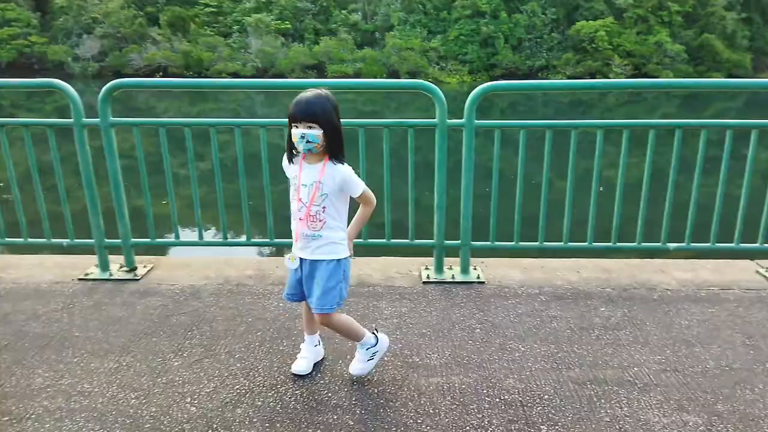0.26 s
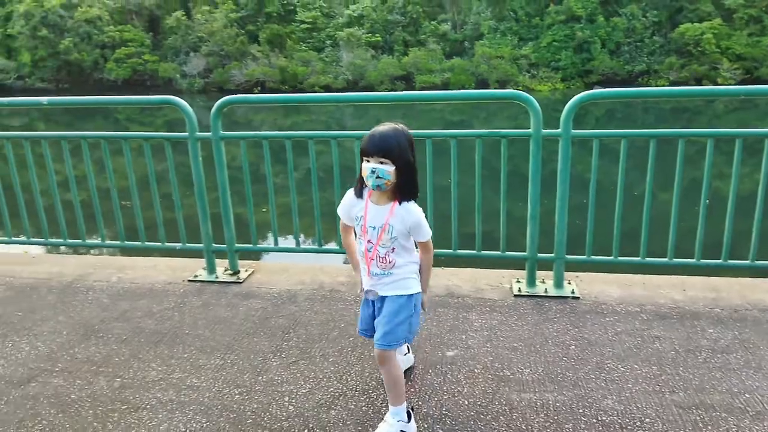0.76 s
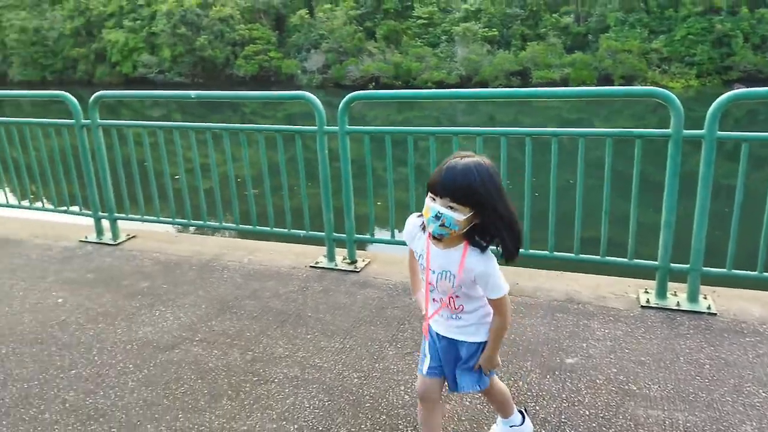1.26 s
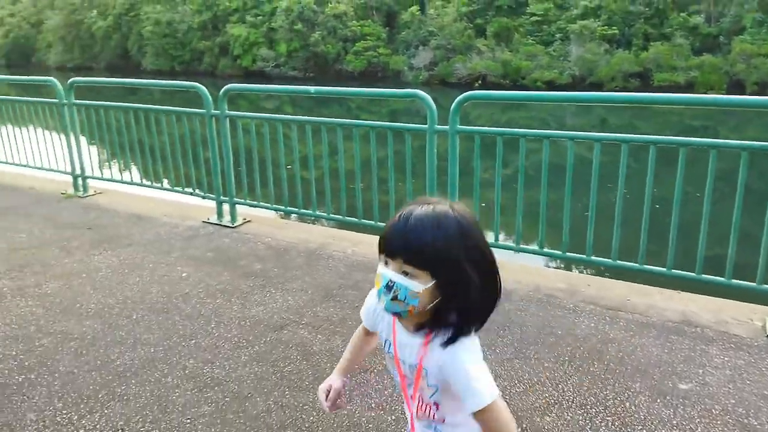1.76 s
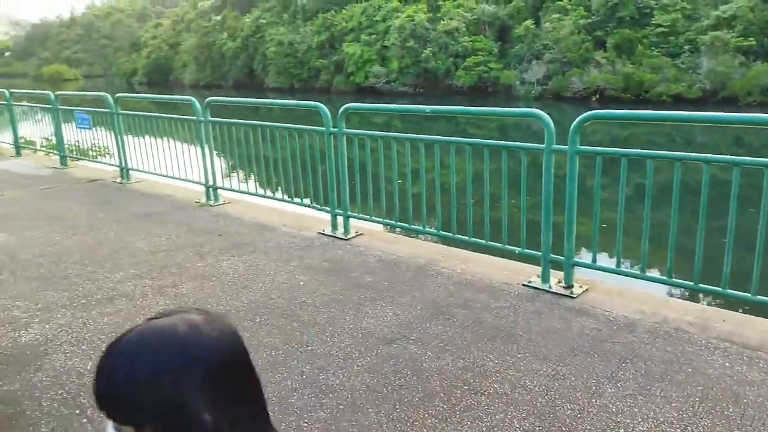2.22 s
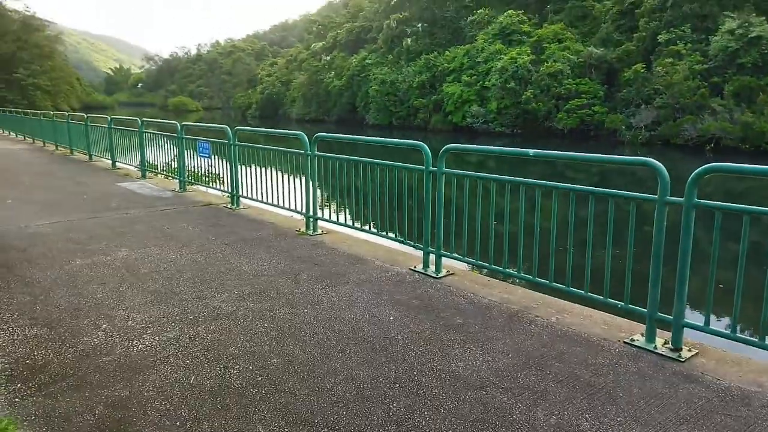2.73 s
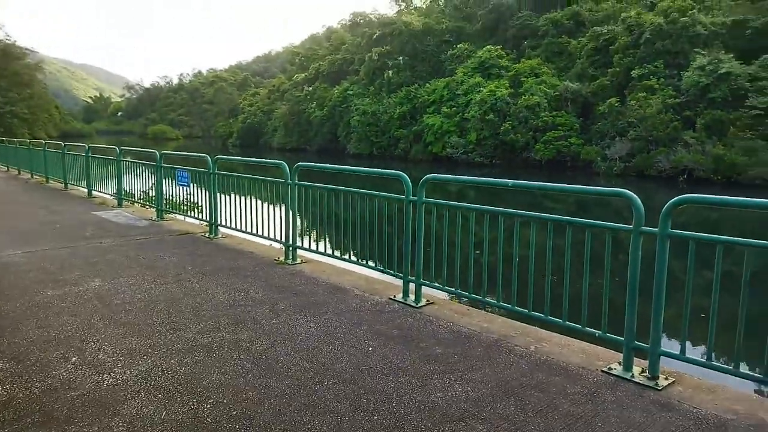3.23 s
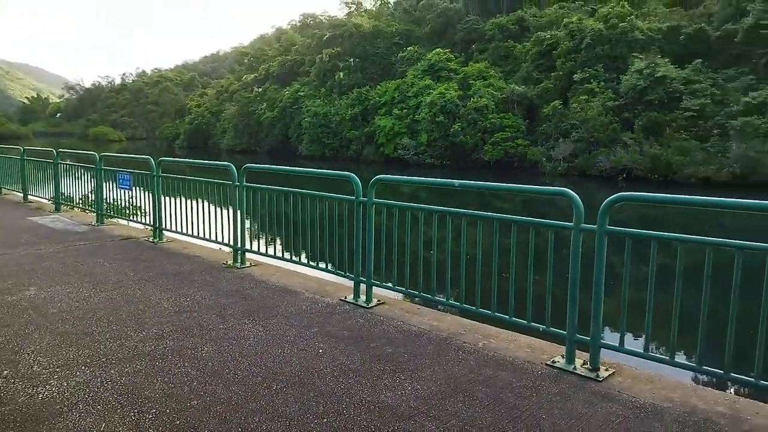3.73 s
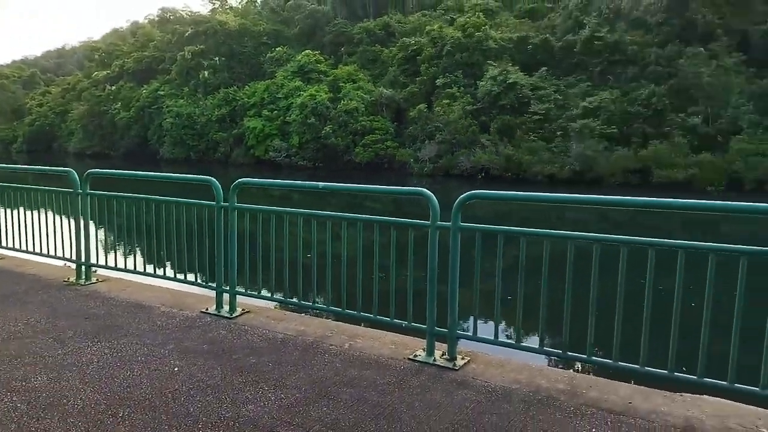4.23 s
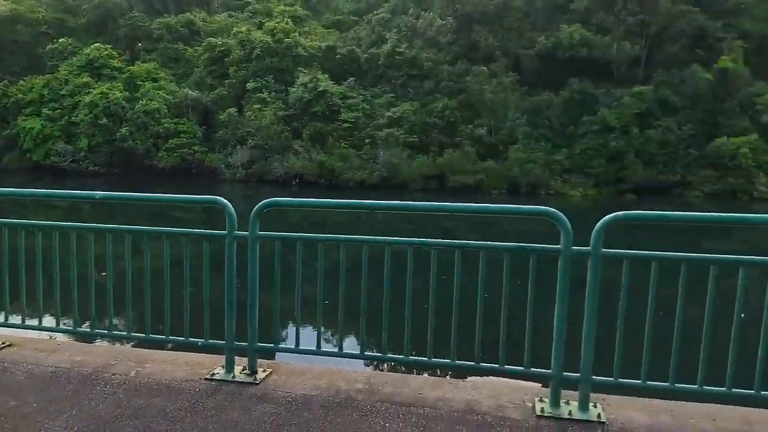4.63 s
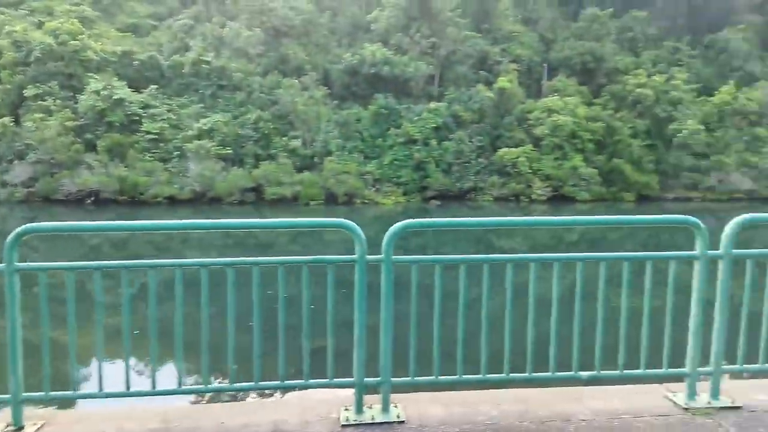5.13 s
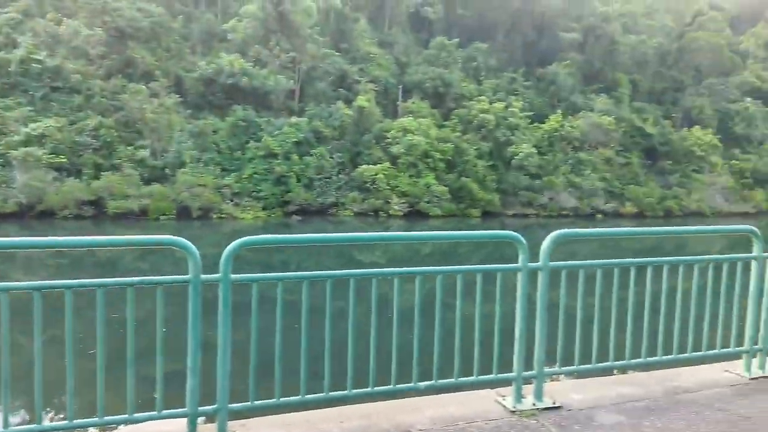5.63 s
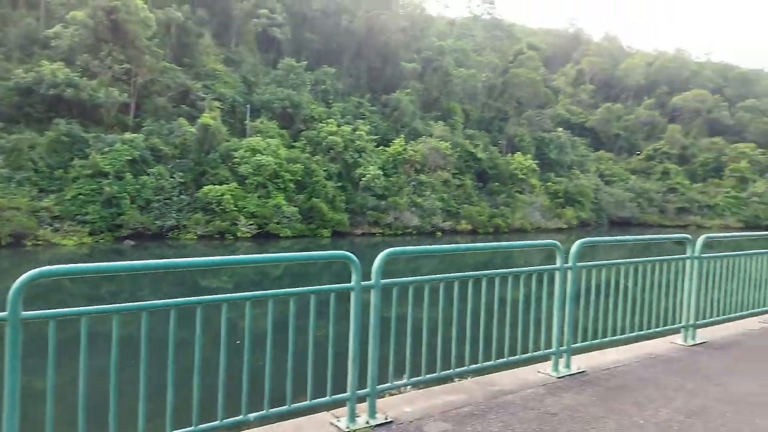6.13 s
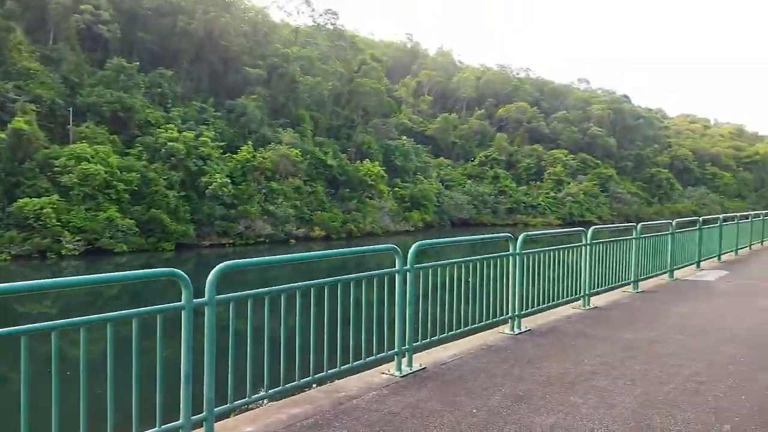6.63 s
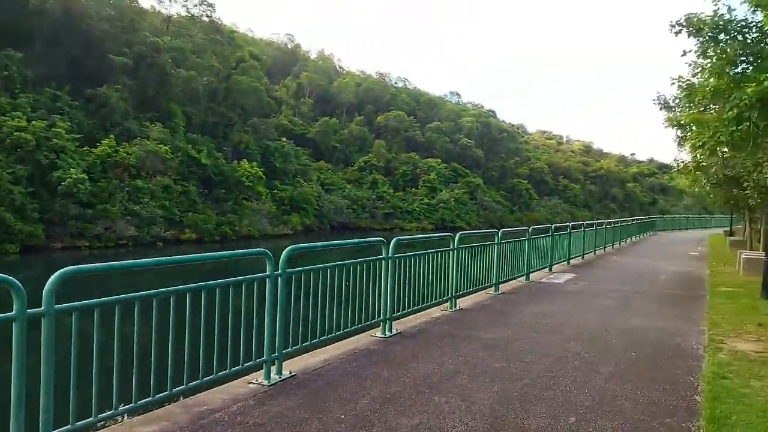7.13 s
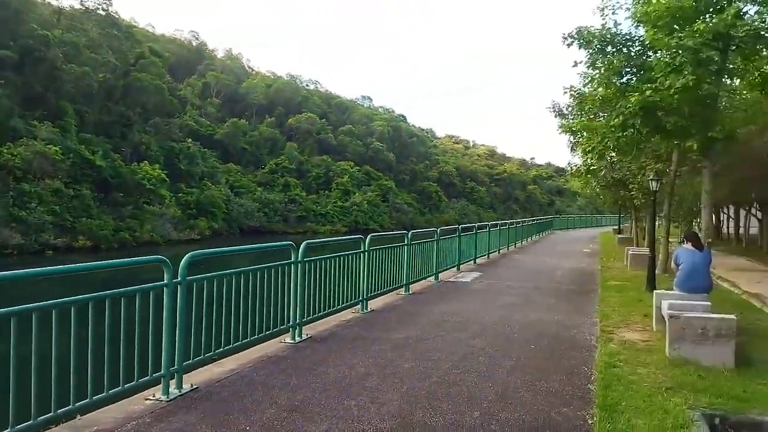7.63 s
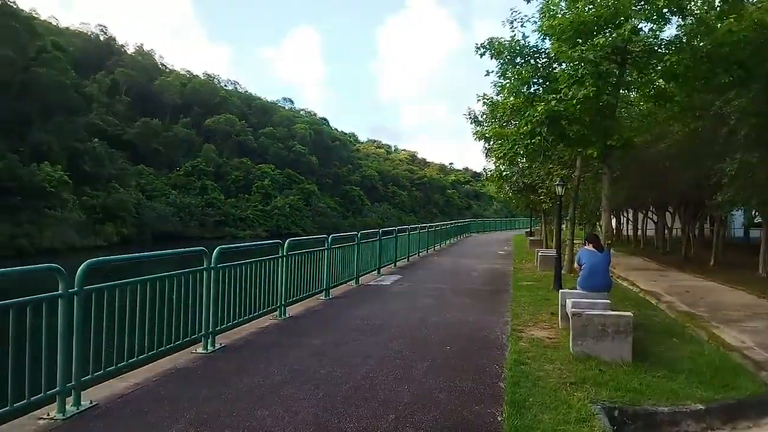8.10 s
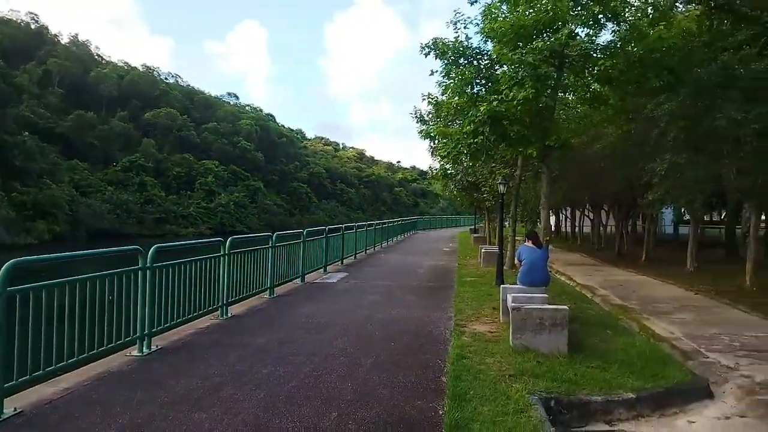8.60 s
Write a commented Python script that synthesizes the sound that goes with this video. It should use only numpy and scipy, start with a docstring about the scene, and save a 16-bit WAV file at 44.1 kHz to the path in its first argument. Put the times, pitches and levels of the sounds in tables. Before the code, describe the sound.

A steady, dense cicada chorus fills the outdoors, a bright shimmering shrill mostly between 4 and 8 kHz, with softly fluctuating individual singers. A soft step lands at 0.17 s, then everything drops to silence from about 0.19 to 0.34 s and fades back in. A faint hoarse bird phrase, falling and echoing, begins near 0.4 s. Child's shoes thud on gritty asphalt at 1.35 s, loudest at 1.77 and 2.1 s, with crisp scuffs and a sharp grit snap at 2.6 s. Lighter steps and scrapes continue to about 6.2 s. The bird phrase returns at 3.6 and 7.1 s; thin single whistles dot the scene, clearer around 5 s and after 7.4 s. Low distant rumble, leaves and a barely audible hum stay beneath. From 5 s the cicadas swell by several decibels and lean left, continuing to the end at 8.9 s.

```python
"""A cicada chorus shrills in the woods across a pond while a hand-held camera turns along a park path.
Ringing tymbal clicks make the near singers and shaped noise the far swarm. A child's shoes thud and scuff
past as grain bursts through resonances; gliding sines make one bird's repeated falling phrase and single
whistles. Shaped noise and a faint hum lie beneath as a far town rumble and leaves.
The sound drops out once near the start and fades back in."""
import sys
import numpy as np
from scipy import signal
from scipy.fft import rfft, irfft, next_fast_len
from scipy.io import wavfile
from scipy.ndimage import uniform_filter1d, map_coordinates

SR = 44100
rng = np.random.default_rng(int(sys.argv[2]) if len(sys.argv) > 2 else 0)


def wav_record(signal):
    """Record a signal, one row per channel, as 16-bit PCM in the file named by sys.argv[1]."""
    frames = np.transpose(np.atleast_2d(signal))
    bounded = np.clip(frames, -1, 1)
    # unit amplitude maps onto the largest positive 16-bit level
    quanta = np.round(bounded * 32767).astype(np.int16)
    wavfile.write(sys.argv[1], SR, quanta)


N = 390726
TIME = np.arange(N) / SR

# The chorus grows as the camera turns: (time [s], level [dB])
CHORUS_LEVEL = [(0, -43.5), (.2, -45), (.5, -46), (1.1, -46), (4.7, -45.5), (5.6, -44), (6.3, -42.5),
                (7.05, -41), (8.86, -40.5)]
# Where the chorus lies: (time [s], left over right [dB])
CHORUS_PAN = [(0, -2), (.9, -0.5), (2, 0.5), (5.2, -1.5), (6.6, -4.5), (8.86, -4.5)]
# Single cicadas standing out of the chorus: (tymbal frequency [Hz], width of one pass [Hz], level [dB])
SINGERS = [(4977, 92, -11), (5366, 240, -2), (5726, 190, -3.5), (6054, 190, 0.5), (6300, 320, 0.5),
           (6580, 480, -1), (6750, 120, -4), (7046, 46, -6.5), (7766, 410, -10), (8810, 170, -16.5),
           (10700, 120, -33), (11900, 400, -20)]
# Spectrum of the blurred far chorus: (frequency [Hz], relative density [dB per Hz])
SWARM_SPECTRUM = [(2180, -57), (3700, -40), (3860, -54), (3980, -13.5), (4710, -10), (5220, -10),
                  (6340, 3.5), (6940, 2.5), (7550, -14), (8790, -10.5), (11500, -20.5), (12200, -24),
                  (15700, -25)]
# The shrill band dips briefly: (centre time [s], length [s], depth [dB])
SHRILL_DIPS = [(4.875, .026, -9), (5.133, .022, -12)]

# Spectrum of town rumble and leaves: (frequency [Hz], relative density [dB per Hz])
AIR_SPECTRUM = [(24, -53), (40, -20), (65, -2.5), (166, -5), (227, -4.5), (314, -7.5), (641, -19),
                (734, -16.5), (1850, -22.5), (2420, -16.5), (3700, -22), (4000, -22), (5200, -45.5),
                (8800, -120)]
# Swell of rumble and leaves: (time [s], level [dB])
AIR_LEVEL = [(0, -52), (.5, -54.5), (1.5, -57.5), (2.3, -53.5), (3.7, -57.5), (8.86, -56.5)]
# How alike diffuse noise is in the two channels: (frequency [Hz], left-right likeness [-1 to 1])
STEREO_LIKENESS = [(60, 0.94), (150, 0.96), (380, 0.61), (950, 0), (2380, -0.0), (5980, 0.0092), (15000, 0)]
HUM_HZ, HUM_DB, HUM_WAVER_HZ = 320.4, -68, 1.2  # a far machine's hum

# Soles landing: (time [s], strength [dB], grit over the thump [dB])
THUDS = [(0.064, -46, -17), (0.1677, -24.5, -7), (.54, -45, -9), (1.126, -50, 5), (1.347, -23.5, -29),
         (1.371, -35.5, -6), (1.771, -11.5, -14.5), (1.781, -17, -18), (2.1082, -19.5, -8),
         (2.112, -18.5, -16), (2.1193, -13.5, -11), (2.1252, -19, -10), (2.1333, -16, -10),
         (2.486, -24.5, -10.5), (2.7715, -23, -13), (2.617, -47, 12.5), (2.906, -29, -22),
         (3.399, -30, -15), (3.515, -53, 3), (3.692, -32, -10), (4.007, -27.5, -11), (4.703, -34.5, -22),
         (5.061, -25, -18), (5.388, -45, 0), (5.403, -45, 8), (5.4166, -22, -21), (5.435, -39, -20),
         (5.451, -34, -17), (5.967, -28.5, -11), (6.182, -45.5, 1)]
# Scuffs and snaps of grit under the shoes:
# (peak time [s], length [s], strength [dB], fine grit over coarse [dB], top fizz over coarse [dB])
SCUFFS = [(1.35, 0.0026, -48, -15, -25), (1.365, .005, -46, -12, -24.5), (1.379, .006, -48, -4, -25),
          (1.7738, .002, -30, -33, -15.5), (1.782, .006, -44, -13, -5), (2.110, 0.0035, -34, 5.5, -10),
          (2.1198, 0.003, -39, -5, -25), (2.1266, 0.003, -28, -9, -30), (2.1356, 0.002, -24.5, -23, -33),
          (2.190, .002, -30, -21, -24), (2.194, 0.0022, -32.5, -22, -14.5), (2.278, 0.006, -38.5, -20, -27),
          (2.288, 0.0034, -50, -15, -26.5), (2.301, .005, -45.5, -13, -27),
          (2.458, .006, -33.5, -0.5, -16.5), (2.494, .01, -41, -7, -14), (2.604, 0.0018, -29, -12.5, -26),
          (2.6088, 0.0012, -17, 3, -11.5), (2.613, .0015, -25, -9, -23), (2.619, .002, -29.5, -2, -10),
          (2.671, 0.014, -44, -10, -19), (2.687, .008, -35, -2, -19), (2.699, .005, -35, -1, -24),
          (2.707, .005, -33, 1, -21.5), (2.7865, .002, -25, -3.5, -8), (2.789, 0.0035, -26, 1, -14.5),
          (2.848, 0.0064, -38.5, -3, -13), (2.903, .012, -41.5, -13, -15), (3.17, 0.0042, -34, 4, -10.5),
          (3.25, .012, -43.5, -10, -19), (3.273, 0.0091, -39, 0, -24), (3.47, .006, -48, -15, -27),
          (3.497, .008, -40, -11, -25), (3.515, .004, -31.5, -4, -25), (3.701, .02, -45.5, 1.5, -5.5),
          (4.008, 0.0066, -35, 2, -16), (4.113, 0.017, -47.5, -1, -18), (4.49, 0.018, -48, -8, -28)]
# Resonances of rubber sole on asphalt: (frequency [Hz], width [Hz], level [dB])
SOLE_MODES = [(286, 176, 2), (403, 187, 2), (633, 300, -8.5)]
# Resonances of coarse grit: (frequency [Hz], width [Hz], level [dB])
COARSE_GRIT_MODES = [(1650, 1600, -5.5), (2620, 570, 5.5)]
# Resonances of fine grit: (frequency [Hz], width [Hz], level [dB])
FINE_GRIT_MODES = [(3560, 560, 4), (4660, 490, 3.5)]
THUD_RISE_S, THUD_DECAY_S = 0.00302, 0.0088
SCUFF_RISE = 1.1  # a scuff swells over this multiple of its length
PUSH_DB, ROLL_DB = 20.5, -5  # the heel's single push and the rubber's roll after it, over the strength

# Notes of the bird's phrase:
# (time after its start [s], length [s], first pitch [Hz], last pitch [Hz], level [dB])
PHRASE_NOTES = [(0, 0.0258, 2080, 2800, 2), (0.01, 0.036, 3256, 3385, -3.5),
                (.195, 0.019, 3130, 2950, -4.5), (0.213, 0.0331, 2820, 2400, 4),
                (.235, 0.043, 2728, 2640, 1), (.315, .016, 2600, 1950, -3.5),
                (0.335, 0.025, 2465, 2196, -1.5), (.352, 0.0226, 2300, 1713, -4.5),
                (.385, .025, 2200, 1780, -10), (0.44, 0.053, 1700, 1560, -17.5)]
# Each singing of the phrase: (start time [s], level [dB], and changes to the first high note [dB],
# second high note [dB], opening note [dB], closing notes [dB])
PHRASES = [(0.379, -49, 3, 0, 2, 0), (3.6, -43, -6, -7, -0.5, -1), (7.07, -48, 3, 2, -5.5, -0.096)]
# Single bird whistles, some just before the phrase:
# (time [s], length [s], first pitch [Hz], last pitch [Hz], level [dB], left over right [dB])
WHISTLES = [(0.415, .09, 1313, 1393, -62.5, -3), (3.455, 0.055, 2950, 2830, -64, -3),
            (3.474, 0.043, 2430, 2460, -62, -3), (7.062, 0.034, 1580, 1630, -67, -3),
            (7.176, 0.053, 1650, 1580, -72, -3), (7.26, .06, 1735, 1720, -66, -3),
            (3.713, 0.098, 4300, 4265, -58.5, -5), (4.14, 0.2, 2990, 3070, -67, -10),
            (4.56, .05, 2050, 2110, -67, -3), (4.63, 0.065, 2540, 2424, -63, -11),
            (4.70, 0.075, 2540, 2400, -66.5, -11), (4.79, .06, 2430, 2510, -68, -9),
            (4.949, 0.2, 3810, 3620, -54.5, -12), (5.287, .12, 4414, 4400, -58.5, -14),
            (5.348, 0.047, 2830, 2620, -60.5, -1), (6.368, 0.12, 2635, 2580, -58.5, -7),
            (6.567, 0.09, 2060, 1864, -60, -4), (6.62, 0.19, 1885, 1892, -64, -4),
            (6.97, 0.074, 2750, 2630, -66.5, -7), (7.039, 0.072, 2515, 2606, -61, -8),
            (7.442, 0.16, 4400, 4370, -55, -4), (7.662, 0.088, 4070, 4030, -51, 1),
            (7.694, 0.041, 3360, 3250, -59, 3), (7.82, 0.22, 3894, 4156, -54, 3)]
CLOSING_S = 0.3  # notes after this close the phrase
PHRASE_BURR = 0.4  # the phrase is hoarse: depth of a fast random flutter

# The two ports colour all sounds differently: (frequency [Hz], left over right [dB])
PORT_TILT = [(300, 0), (1200, -0.5), (2600, -7), (4500, -0.5), (6500, 0.5), (8500, 10.5), (11000, -0.5),
             (15500, 4.5)]
# Wind filter and dips of the camera body: (frequency [Hz], gain [dB])
HOUSING_GAIN = [(30, 3.5), (55, -7), (80, -0.5), (3300, 0), (3750, -3), (4050, -0.5), (7200, 1), (7450, 4),
                (7700, 1.5), (11100, 2), (11500, -4), (11900, 3.5)]
CUT_S, FALL_DB_PER_S = 0.1846, 3505  # the sound drops out
BACK_S, JUMP_DB_PER_S, BACK_DB, FADE_S = 0.3407, 3500, -7.5, 0.15  # it jumps back a little low and fades up
TOP_HZ = 15790  # band limit


def amp(db):
    """Turn decibels into an amplitude factor."""
    return 10 ** (np.asarray(db) / 20)


def unit(x):
    """Scale to an rms of 1."""
    return x / np.sqrt(np.mean(x ** 2) + 1e-20)


def along(points, hz):
    """Read (frequency [Hz], value) points on a log frequency axis."""
    f, v = np.transpose(points)
    return np.interp(np.log(hz + 1), np.log(f + 1), v)


def curve(points):
    """Read (time [s], value) points at every sample."""
    s, values = np.transpose(points)
    return np.interp(TIME, s, values)


def wobble(rate):
    """A smooth random curve through rate knots a second."""
    knots = rng.standard_normal(int(N * rate / SR) + 4)
    return map_coordinates(knots, [TIME * rate])


def panned(x, db):
    """Two channels, db louder on the left."""
    return np.array([x * amp(db / 2), x * amp(-db / 2)])


def filtered(x, response):
    """Shape the spectrum of x by a complex response of frequency."""
    m = next_fast_len(N + 8192)
    return irfft(rfft(x, m) * response(np.fft.rfftfreq(m, 1 / SR)), m)[..., :N]


def modes(table):
    """Causal response of (frequency [Hz], width [Hz], level [dB]) resonances, alternating in sign."""
    def response(f):
        total = 0
        for k, (centre, width, db) in enumerate(table):
            damping = 1j * f * width
            total = total + (-1) ** k * amp(db) * damping / (centre ** 2 - f ** 2 + damping)
        return total
    return response


def rush(spectrum, patchy_db):
    """Stereo noise of rms 1: random gains patch time and frequency, mid and side set the width."""
    grid = signal.stft(rng.standard_normal((2, N)), nperseg=1024)[2]
    patches = uniform_filter1d(rng.standard_normal(grid.shape), size=2, axis=1)
    patches = uniform_filter1d(patches, size=3, axis=2)
    pair = signal.istft(grid * amp(patchy_db * unit(patches)), nperseg=1024)[1][:, :N]

    def mid_side(hz):
        angle = np.arccos(np.clip(along(STEREO_LIKENESS, hz), -1, 1)) / 2
        return amp(along(spectrum, hz)) * [np.cos(angle), np.sin(angle)]

    mid, side = filtered(pair, mid_side)
    return unit(np.array([mid + side, mid - side]))


def scatter(x, t60):
    """Echoes off surroundings: noise tails of energy 1, redrawn every eighth of a second and cross-faded."""
    hop = SR // 8
    t = np.arange(SR // 2) / SR
    decay = amp(-60 * t / t60)
    decay = decay / np.linalg.norm(decay)
    window = np.sin(np.pi * np.arange(2 * hop) / (2 * hop))
    padded = np.pad(x, ((0, 0), (hop, 2 * hop)))
    out = np.zeros((2, N + SR * 2))
    for at in range(0, N + hop, hop):
        tail = rng.standard_normal((2, len(t))) * decay
        echo = signal.fftconvolve(padded[:, at:at + 2 * hop] * window, tail, axes=1)
        out[:, at:at + echo.shape[1]] += echo
    return out[:, hop:hop + N]


def cicadas():
    """Each singer buckles its tymbal a few hundred times a second into one resonance; the rest blur."""
    near = np.zeros((2, N))
    for hz, width_hz, db in SINGERS:
        buckle_hz = rng.uniform(180, 320) * (1 + 0.18 * wobble(150))
        cycles = np.cumsum(buckle_hz) / SR
        buckles = np.diff(np.floor(cycles), prepend=0) * amp(2.35 * rng.standard_normal(N))
        tymbal = modes([(hz, width_hz, 0)])
        song = unit(filtered(buckles, lambda f: tymbal(f) ** 2))
        song_db = db + 1.9 * wobble(12) + 1.4 * wobble(4)
        near += panned(song * amp(song_db), 1.1 * wobble(0.63))
    near = scatter(near, t60=0.091)
    # hold the slow level of the sum even
    near = near / np.sqrt(np.abs(uniform_filter1d(near ** 2, size=SR // 5, axis=1)))
    chorus = amp(-3) * near + amp(-4) * rush(SWARM_SPECTRUM, patchy_db=5)

    dip_db = sum(db * np.exp(-((TIME - s) / (length / 2)) ** 4) for s, length, db in SHRILL_DIPS)
    shrill = filtered(chorus, lambda hz: (hz > 4000) & (hz < 7500))
    chorus = chorus + (amp(dip_db) - 1) * shrill
    pan_db = curve(CHORUS_PAN)
    return unit(chorus) * amp(curve(CHORUS_LEVEL)) * amp([pan_db / 2, -pan_db / 2])


def background():
    """Far traffic and leaves as swelling shaped noise, under a faint hum wavering in pitch and level."""
    hum_hz = HUM_HZ + HUM_WAVER_HZ * wobble(8)
    hum = unit(np.sin(2 * np.pi * np.cumsum(hum_hz) / SR)) * amp(HUM_DB + wobble(2.91))
    air_db = curve(AIR_LEVEL) + 0.98 * wobble(4)
    return amp(air_db) * rush(AIR_SPECTRUM, patchy_db=3) + hum


def bursts(s, db, length, rise, spiky_db):
    """A run of uneven grains for each contact, swelling up to its time and dying over its length."""
    out = np.zeros(N + SR)
    t = np.arange(SR // 8) / SR
    for peak, level, life, up in zip(s, db, length, rise):
        shape = np.where(t < up, (t / up) ** 0.67, np.exp(-np.abs(t - up) / life))
        grains = shape * rng.standard_normal(len(t)) * amp(spiky_db * rng.standard_normal(len(t)))
        # few large grains or many small ones carry the same energy
        energy = np.linalg.norm(shape) / np.linalg.norm(grains)
        out[round((peak - up) * SR):][:len(t)] += amp(level) * energy * grains
    return out[:N]


def thuds():
    """Soles push and roll into rubber resonances, and grit crunches under them: (thump, crunch)."""
    s, db, grit_db = np.transpose(THUDS)
    decay, rise = np.full(len(s), THUD_DECAY_S), np.full(len(s), THUD_RISE_S)
    push = np.bincount(np.round(s * SR).astype(int), amp(db + PUSH_DB), N)
    push = uniform_filter1d(uniform_filter1d(push, size=20), size=20)  # rubber rounds the push
    roll = bursts(s + rise, db + ROLL_DB, decay, rise, spiky_db=3)
    thump = filtered(roll - push, modes(SOLE_MODES))
    grains = bursts(s + rise / 2, db + grit_db, decay / 2, rise, spiky_db=7.5)
    crunch = filtered(grains, lambda f: modes([(1050, 1100, 0)])(f) ** 2)
    return thump, crunch


def scuffs():
    """Grit scrapes and snaps: separate grain bursts ring coarse grit, fine grit and a top fizz."""
    s, length, db, fine_db, fizz_db = np.transpose(SCUFFS)
    rise = SCUFF_RISE * length
    coarse = filtered(bursts(s, db, length, rise, spiky_db=10), modes(COARSE_GRIT_MODES))
    fine = filtered(bursts(s, db + fine_db, length, rise, spiky_db=4), modes(FINE_GRIT_MODES))
    fizz_modes = modes([(7840, 3000, 1.4), (11600, 4000, 4.8)])
    fizz = filtered(bursts(s, db + fizz_db, length, rise, spiky_db=4.5), fizz_modes)
    return coarse + fine + fizz


def shoes():
    """Thumps and crunches sit alike in both ports, scuffs reach the left first; the ground scatters all."""
    thump, crunch = thuds()
    grit = scuffs()
    grit = np.array([grit, np.roll(grit, shift=16)])  # right port 16 samples later
    echo = scatter(grit + crunch + amp(-20.5) * thump, t60=0.045)
    return thump + crunch + grit + amp(-3) * echo


def note(length, hz0, hz1, db, burr):
    """One gliding whistle, wavering in pitch and strength, hoarse by burr."""
    u = np.linspace(0, 1, round(length * SR))

    def waver():
        return np.interp(u, np.linspace(0, 1, 10), rng.standard_normal(10))

    hz = hz1 + (hz0 - hz1) * (1 - u) ** 1.543 + 20 * waver()
    flutter = 1 + burr * unit(uniform_filter1d(rng.standard_normal(len(u)), size=110))
    swell = np.sin(np.pi * u ** 0.85) ** 0.78
    return flutter * amp(db + 1.4 * waver()) * swell * np.sin(2 * np.pi * np.cumsum(hz) / SR)


def bird_phrase():
    """One bird repeats its phrase of hoarse glides, heard mostly as echo from near and far trees."""
    song = np.zeros((2, N + SR))
    for start, level_db, high_db, second_high_db, opening_db, closing_db in PHRASES:
        first_notes_db = {0: opening_db, 1: high_db, 2: second_high_db}
        for k, (s, length, hz0, hz1, db) in enumerate(PHRASE_NOTES):
            note_db = level_db + db + first_notes_db.get(k, 0) + closing_db * (s > CLOSING_S)
            wave = note(length, hz0, hz1, note_db, PHRASE_BURR)
            at = round((start + s) * SR)
            song[:, at:at + len(wave)] += wave
    song = song[:, :N]
    near_trees, far_trees = scatter(song, t60=0.18), scatter(song, t60=1.1)
    return amp(-7.5) * song + amp(-1) * near_trees + amp(-3) * far_trees


def whistles():
    """Smoother single glides, panned row by row and drier than the phrase."""
    calls = np.zeros((2, N + SR))
    for s, length, hz0, hz1, db, pan_db in WHISTLES:
        wave = note(length, hz0, hz1, db, burr=0.07)
        at = round(s * SR)
        calls[:, at:at + len(wave)] += panned(wave, pan_db)
    calls = calls[:, :N]
    return calls + amp(-1) * scatter(calls, t60=0.4)


def scene():
    """All layers together; the two ports colour all sounds differently."""
    def ports(hz):
        tilt_db = along(PORT_TILT, hz)
        return amp([tilt_db / 2, -tilt_db / 2])

    return filtered(cicadas() + background() + shoes() + bird_phrase() + whistles(), ports)


def record(dry):
    """The camera body colours the sound, which drops out once; nothing is kept above the band limit."""
    coloured = filtered(dry, lambda hz: amp(along(HOUSING_GAIN, hz)))
    out_db = -FALL_DB_PER_S * np.maximum(TIME - CUT_S, 0)
    fade_db = BACK_DB * np.clip(1 - (TIME - BACK_S) / FADE_S, 0, 1)
    back_db = fade_db - JUMP_DB_PER_S * np.maximum(BACK_S - TIME, 0)
    gated = coloured * amp(np.maximum(out_db, back_db))
    return filtered(gated, lambda hz: hz < TOP_HZ)


dry = scene()
out = record(dry)
wav_record(out)
```